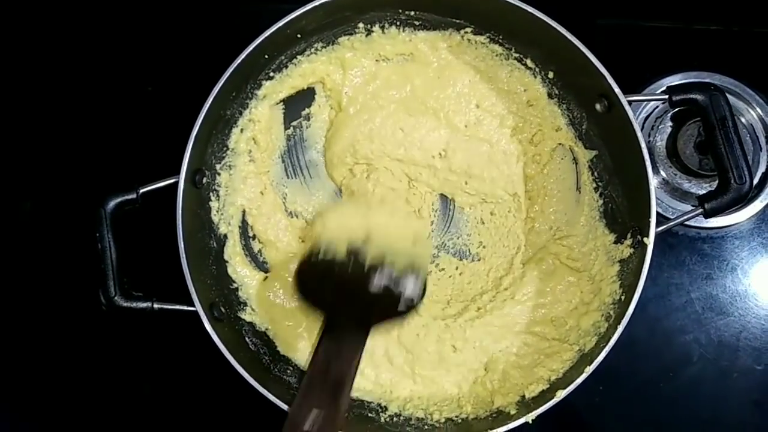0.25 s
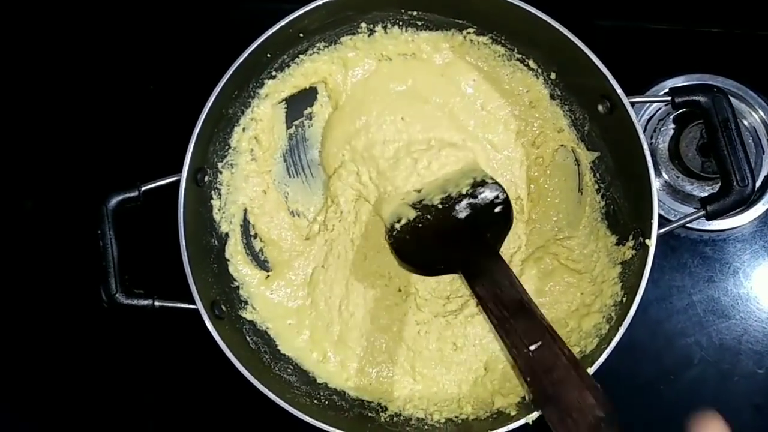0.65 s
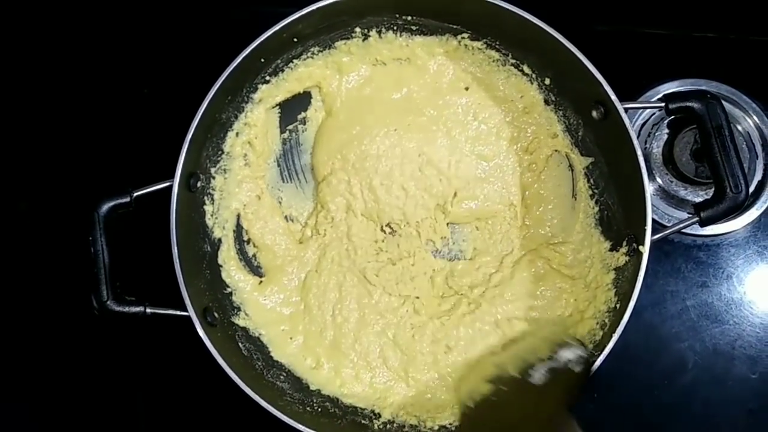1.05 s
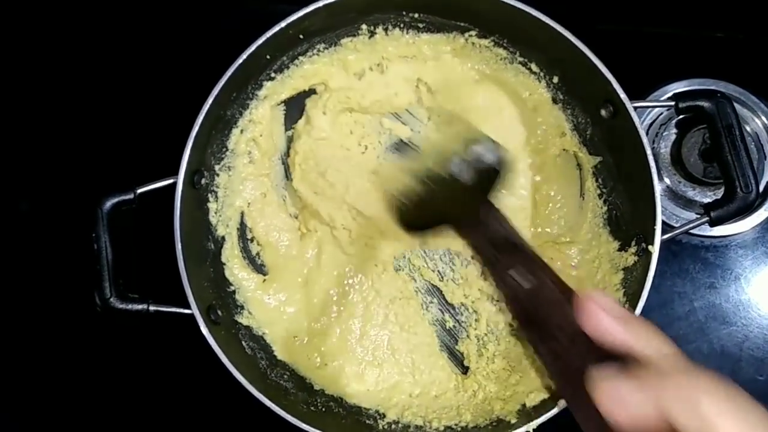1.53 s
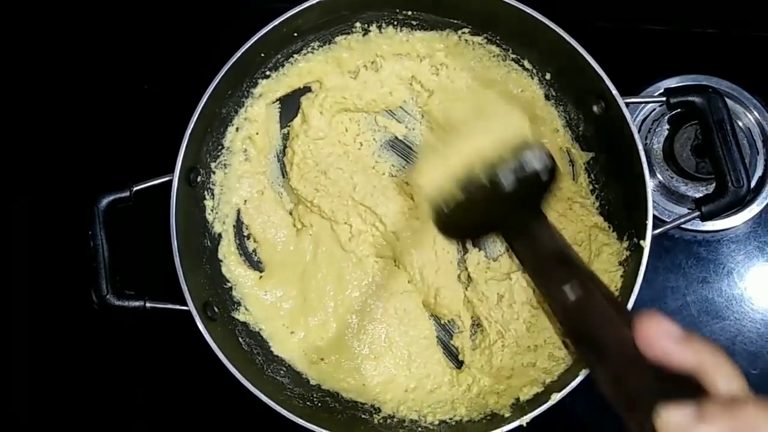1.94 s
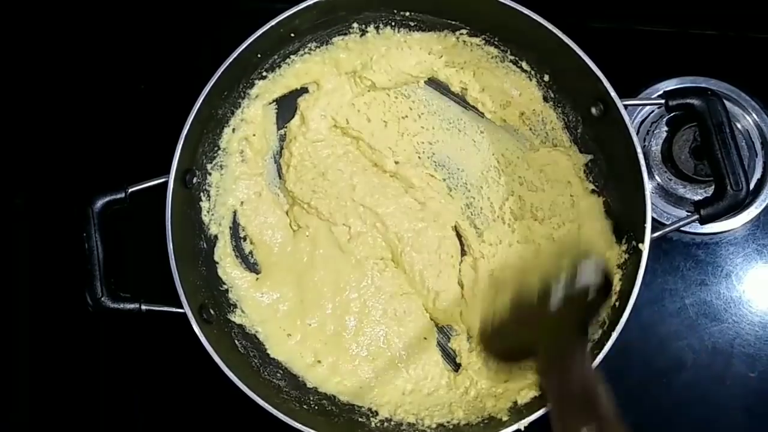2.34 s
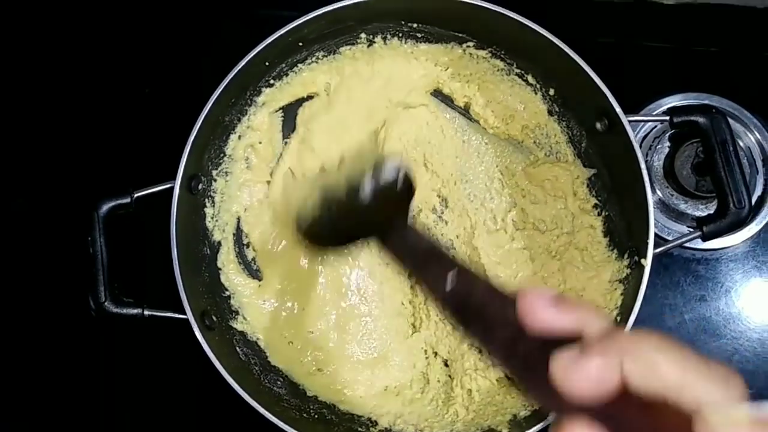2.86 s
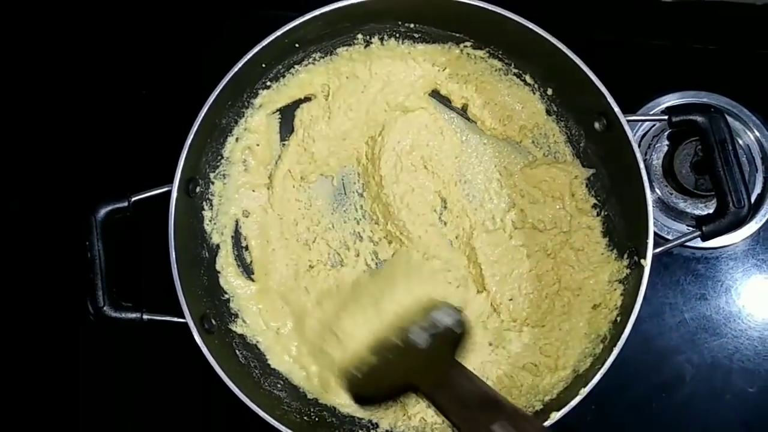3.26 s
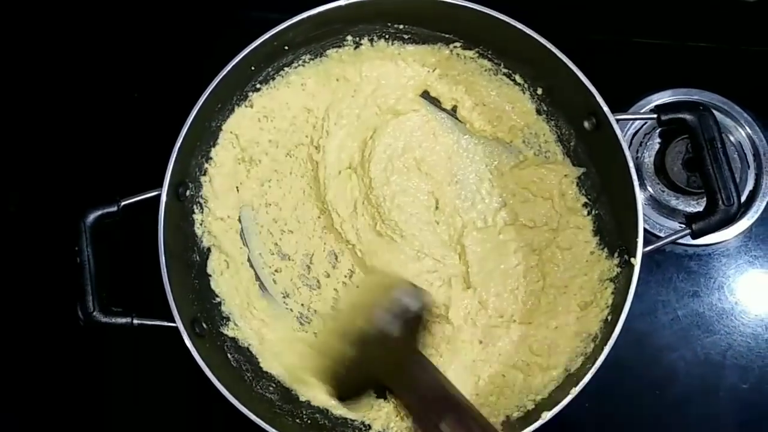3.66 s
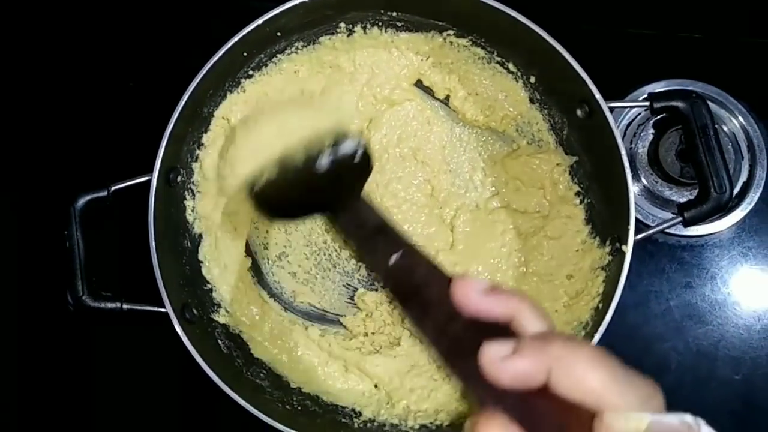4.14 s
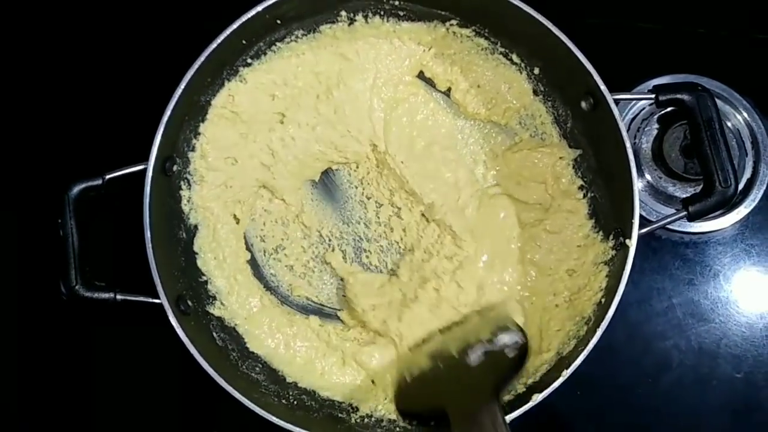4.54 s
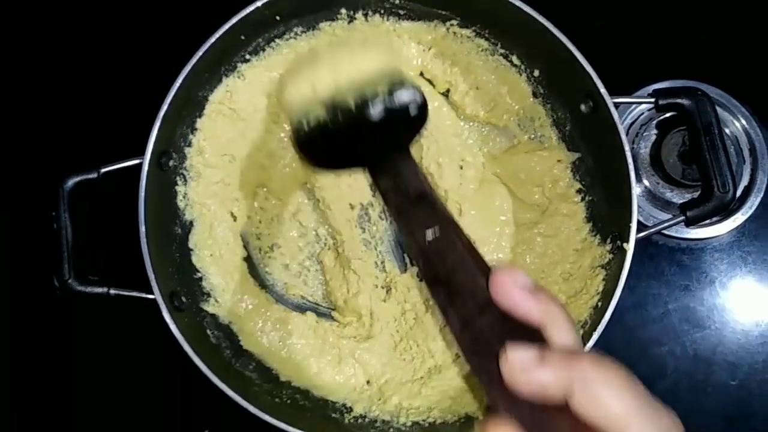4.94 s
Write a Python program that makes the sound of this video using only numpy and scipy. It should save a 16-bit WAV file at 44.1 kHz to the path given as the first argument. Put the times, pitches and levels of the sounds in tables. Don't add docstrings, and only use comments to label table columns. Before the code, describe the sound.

A close, dry kitchen sound with little echo and slightly different grit in each ear. It begins quietly with sparse grit and clicks; at about 0.2 to 0.4 s a hissing scrape chatters with a nasal pan ring, then nearly rests, with faint hum flutters. A softer drag follows at 0.76 s. A hard, ringing knock at 1.08 s begins regular spatula strokes, roughly three per second, with strong landings at 1.45, 1.83 and 2.13 s. Each is a low paste-damped thud followed by a bright, grainy hiss that swells and fades. Wet paste snaps crackle throughout, sharpest near 1.25 and 1.55 s. Strokes continue through 2.5, 2.8, 3.2, 3.46 and 3.8 s, then soften after 4 s. Two dull microphone-mount bumps come at 4.7 s, sound drops away briefly, a scrape returns at 4.85 s, and bright bare steel clangs and rattles at 5.1 s.

```python
import sys
import numpy as np
from scipy import signal
from scipy.fft import rfft, irfft, next_fast_len
from scipy.io import wavfile
from scipy.ndimage import uniform_filter1d

SR = 44100
rng = np.random.default_rng(int(sys.argv[2]) if len(sys.argv) > 2 else 0)


def voltage_ratio(level):
    return 10 ** (np.asarray(level, float) / 20)


def master_out(mix):
    frames = np.transpose(np.atleast_2d(mix))
    ceiling = np.clip(frames, -1, 1)
    pcm = np.round(ceiling * 32767).astype(np.int16)
    wavfile.write(sys.argv[1], SR, pcm)


N = 228894


def evened(x):
    return x / np.sqrt(np.mean(x ** 2) + 1e-20)


def read(points, hz):
    f, value = np.transpose(points)
    return np.interp(np.log(hz + 1), np.log(f + 1), value)


def over_time(points):
    return np.interp(np.arange(N) / SR, *np.transpose(points))


def add(mix, s, sound):
    part = mix[..., round(s * SR):][..., :sound.shape[-1]]
    part += sound[..., :part.shape[-1]]


def resonate(x, hz, width):
    r = np.exp(-np.pi * width / SR)
    if np.isscalar(hz):
        return 2 * signal.lfilter([1 - r], [1, -r * np.exp(2j * np.pi * hz / SR)], x).real
    turn = np.exp(2j * np.pi * np.cumsum(hz) / SR)
    return 2 * (turn * signal.lfilter([1 - r], [1, -r], x / turn)).real


def colour(x, points):
    size = next_fast_len(x.shape[-1], True)
    hz = np.fft.rfftfreq(size, 1 / SR)
    inside = (hz >= points[0][0]) * (hz <= points[-1][0])
    return irfft(rfft(x, size) * voltage_ratio(read(points, hz)) * inside, size)[..., :x.shape[-1]]


def lumps(seconds):
    size = max(round(seconds * SR), 1)
    return evened(uniform_filter1d(uniform_filter1d(rng.standard_normal(N), size), size))


def grit(per_s, spread_db, lump_db, lump_s):
    happens = rng.random((2, N)) < per_s / SR
    size = voltage_ratio(spread_db * np.minimum(rng.exponential(1, (2, N)), 4)) * happens
    return size * rng.standard_normal((2, N)) * voltage_ratio(lump_db * lumps(lump_s))


def ringing(modes, t, since=0):
    phase = 2 * np.pi * rng.random((len(modes), 2, 1)) * np.array([[0], [1]])
    out = 0
    for (hz, db, t60), p in zip(modes, phase):
        out = out + voltage_ratio(db - 60 * t / t60) * np.sin(2 * np.pi * hz * (t + since) + p)
    return out


def dying(rows, db_per_s):
    out, fall = np.zeros(N), voltage_ratio(-db_per_s * np.arange(SR // 2) / SR)
    for s, db, *_ in rows:
        add(out, s, voltage_ratio(db) * fall)
    return out


def patchy(x, depth_db):
    z = signal.stft(x, nperseg=256, noverlap=192)[2]
    field, gaps = rng.standard_normal((2, *z.shape[1:]))
    for _ in range(2):
        field = uniform_filter1d(uniform_filter1d(field, size=3, axis=0), size=16, axis=1)
        gaps = uniform_filter1d(uniform_filter1d(gaps, size=2, axis=0), size=22, axis=1)
    hole_db = 15.0 * np.maximum(evened(gaps) - 1.5, 0)
    return signal.istft(z * voltage_ratio(depth_db * evened(field) - hole_db), nperseg=256, noverlap=192)[1][:, :N]


# frequency in Hz, likeness from 0 to 1.
PORT_LIKENESS = [(25, 0.52), (100, 0.76), (300, 0.96), (600, 0.89), (1100, 0.17), (2500, 0.069),
                 (5000, 0.1), (12000, 0.28)]
# frequency in Hz, left over right in dB.
PORT_BALANCE = [(60, -5), (110, -3), (200, 0.5), (380, 1), (700, -0.5), (1290, 0), (2380, -1), (4400, 0.5),
                (8120, -6.5), (15000, -5.5)]


def ports(pair):
    size = next_fast_len(N, True)
    hz = np.fft.rfftfreq(size, 1 / SR)
    shared, stray = rfft(pair, size)
    same, lean = np.clip(read(PORT_LIKENESS, hz), 0, 1), voltage_ratio(read(PORT_BALANCE, hz) / 2)
    left = (same * shared + np.sqrt(1 - same ** 2) * stray) * lean
    return irfft(np.array([left, shared / lean]), size)[:, :N]


# start in seconds, brightest grit in Hz, its lift in dB,
# left-right balance in dB, lag of the left port in samples.
STROKE_PLACES = [(0, 5500, 7, 0.5, 8), (.18, 8100, 4, -2.5, 8), (.755, 6460, 6.5, 2, 10),
                 (1.081, 6440, -0.5, -1, 5), (1.452, 8800, 2, 0, 3), (1.829, 7440, 1, 0.5, 2),
                 (2.134, 8100, 2, -0.5, 3), (2.477, 7000, 2.5, -0.5, 10), (2.805, 8700, -1, 1, 11),
                 (3.163, 5700, 3.5, -0.5, 8), (3.411, 5630, 3, 0.5, 7), (3.786, 7500, 0, -1, 6),
                 (4.191, 5340, 2, -1, 8), (4.505, 8950, 5, -1.5, 3), (4.851, 7700, 0.5, 1.5, 6),
                 (5.099, 8700, -17, 6.5, 19)]


def place(column):
    rows = np.array(STROKE_PLACES)
    return rows[np.searchsorted(rows[:, 0], np.arange(N) / SR, "right") - 1, column]


def placed(pair):
    later = np.clip(np.arange(N) - np.round(place(4)).astype(int), 0, N - 1)
    side = voltage_ratio(np.array([[.5], [-.5]]) * uniform_filter1d(place(3), 100))
    return np.array([pair[0, later], pair[1]]) * side


# frequency in Hz, time to fall 60 dB in seconds.
KITCHEN_T60 = [(200, 0.37), (1000, 0.11), (4000, 0.091), (12000, 0.13)]


def kitchen(x):
    hz, t, z = signal.stft(rng.standard_normal((2, SR // 2)), SR, nperseg=256)
    tail = signal.istft(z * voltage_ratio(-60 * t / read(KITCHEN_T60, hz)[:, None]), SR, nperseg=256)[1]
    return signal.fftconvolve(x, tail / np.linalg.norm(tail[0]), axes=1)[:, :N]


# time in seconds, drone level in dB.
GATE_LEVEL = [(0, -75), (.2, -71.5), (.43, -61.5), (.58, -74.5), (.75, -68.5), (1.02, -67), (1.3, -66.5),
              (1.65, -70), (2.0, -69.5), (3.1, -73), (3.8, -73.5), (4.479, -84), (4.55, -75.5), (4.68, -81),
              (4.76, -68), (4.8, -97.5), (4.86, -65.5), (5.19, -51.5)]
# frequency in Hz, level in dB.
SIZZLE_SPECTRUM = [(200, -11), (600, -8.5), (2000, -17.5), (4500, -21), (6000, -20), (9000, -22),
                   (11000, -21.5), (16300, -33.5)]


def sizzle():
    bubbles = patchy(evened(colour(grit(12000, 2., 2.5, .03), SIZZLE_SPECTRUM)), 3.5)
    return voltage_ratio(-79.0 + np.minimum(over_time(GATE_LEVEL) + 75, 0)) * bubbles


# frequency in Hz, level in dB.
RUMBLE_SPECTRUM = [(12, -48), (20, -31), (38, -19.5), (70, 1.5), (87, -12), (102, -1.5), (193, -2.5),
                   (225, -29), (240, -31), (310, -56.5), (530, -120)]
# start in seconds, level in dB.
STOVE_JOLTS = [
    (1.48, -56.5),
    (1.83, -49.5),
    (3.17, -61),
    (3.47, -68),
]
# start in seconds, length in seconds, level in dB.
GATED_HUM = [(0.45, 0.031, -54), (0.643, 0.031, -55.5), (0.707, 0.034, -57), (0.744, 0.024, -54),
             (0.78, 0.047, -54.5), (0.87, 0.02, -58.5), (0.945, .05, -68.5), (1.054, .05, -64.5),
             (1.11, 0.046, -67.5), (1.215, 0.031, -62), (1.294, 0.042, -57.5), (1.477, 0.036, -70),
             (1.558, 0.035, -75.5), (1.688, 0.081, -63), (1.915, 0.028, -61.5)]
# start in seconds, end in seconds, pitch in Hz, level in dB.
GATED_RING = (4.425, 4.495, 1068, -79)


def drone():
    hum = 1.1 * np.sin(2 * np.pi * 100 * np.arange(N) / SR) * np.array([[1], [.3]])
    low = evened(colour(rng.standard_normal((2, N)), RUMBLE_SPECTRUM)) + hum
    flutter = voltage_ratio(5.7 * np.tanh(2.2 * lumps(0.009)))
    shake = uniform_filter1d(dying(STOVE_JOLTS, 120.5), size=600)
    low = evened(low * flutter) * (voltage_ratio(over_time(GATE_LEVEL)) + shake)
    for s, length, db in GATED_HUM:
        part = hum[:, round(s * SR):][:, :round(length * SR)]
        add(low, s, voltage_ratio(db) * part * signal.windows.tukey(round(length * SR), .6))
    start, end, hz, db = GATED_RING
    t = np.arange(round((end - start) * SR)) / SR
    add(low, start, voltage_ratio(db) * np.sin(2 * np.pi * hz * t) * signal.windows.tukey(len(t), .5))
    return low


# time in seconds, spike in dB, spike width in seconds,
# swing in dB, swing pitch in Hz, swing time to fall 60 dB in seconds.
MOUNT_BUMPS = [
    (4.6893, -40, 0.00043, -44, 87, 0.094),
    (4.7213, -33, 0.00032, -38.5, 113, 0.028),
]


def bumps():
    out, t = np.zeros(N), np.arange(SR // 8) / SR
    for s, db, width, swing_db, hz, t60 in MOUNT_BUMPS:
        spike = voltage_ratio(db) * np.exp(-(abs(t - .001) / width) ** 1.7)
        swing = voltage_ratio(swing_db - 60 * t / t60) * np.sin(2 * np.pi * hz * t)
        add(out, s - .001, spike - swing)
    return out


# pitch in Hz, level in dB, time to fall 60 dB in seconds.
STEEL_PARTIALS = [(1196, -7, .3), (1572, 1, .5), (1691, -7, .4), (1896, -9, .3), (2476, -6, .28),
                  (2751, -7, .3), (2947, -7, .3), (3122, -10, .3), (3490, -1, .25), (3941, -10, .06),
                  (5103, -18, .14), (6002, -7, .2), (7375, -18, .15), (8150, -17, .12), (9039, -10, .14),
                  (10770, -22, .1)]
# frequency in Hz, level in dB.
CLATTER_SPECTRUM = [(250, -14.5), (900, -10), (1250, 1), (2500, -4), (3650, -6), (3900, -23), (4400, -26.5),
                    (4700, -21), (6000, -12), (7000, -33), (9000, -29), (10000, -31), (16000, -29)]
# start in seconds, level in dB, clatter level in dB.
STEEL_CLANGS = [
    (5.1029, -29, -29.5),
    (5.109, -51, -34.5),
    (5.118, -28.5, -32.5),
    (5.123, -73, -30.5),
    (5.153, -42, -35),
]


def clang():
    out, t = np.zeros((2, N)), np.arange(SR // 8) / SR
    for s, db, clatter_db in STEEL_CLANGS:
        clatter = evened(colour(rng.standard_normal((2, len(t))), CLATTER_SPECTRUM))
        clatter = voltage_ratio(clatter_db - 1.5 - 60 * t / .25) * clatter
        add(out, s, voltage_ratio(db - 3) * ringing(STEEL_PARTIALS, t, s) + clatter)
    return out


# start in seconds, peak in dB, shared over stray part in dB, less 18.5 dB.
PASTE_SNAPS = [(0.0468, -40, -3.5), (0.1818, -40.5, -5.5), (0.1935, -43, -7), (.2668, -38.5, -6),
               (0.8225, -46.5, -3.5), (.8619, -39, -1.5), (.897, -36, -2), (1.4431, -43, -9),
               (1.4523, -35, 8.5), (1.491, -40.5, -3.5), (1.8306, -28, -4.5), (2.6554, -40.5, -1.5),
               (2.7831, -52, -4.5), (2.8823, -34.5, -1.5), (2.915, -36, -3.5), (3.511, -34, -3),
               (3.6407, -37, 4), (3.7978, -33.5, -1.5), (4.1068, -39, -0.5), (4.2, -44.5, -1),
               (4.2526, -35.5, -5), (4.8948, -39, -1.5), (1.244, -23.5, -12), (1.279, -31.5, -6),
               (1.3595, -38.5, -8), (1.3639, -35, -10.5), (1.371, -39.5, -4), (1.418, -44, -9.5),
               (2.993, -33.5, -5), (2.728, -49.5, -5), (2.734, -41, -0.5), (1.5475, -26.5, -5.5),
               (1.549, -22, -1.5), (1.55, -20, -3), (1.5515, -26.5, -3), (.148, -52, -2),
               (0.629, -56.5, -3), (3.475, -34.5, -2), (1.61, -33.5, -4), (1.725, -41, -5),
               (1.79, -48.5, -5.5), (1.817, -39.5, -4.5), (2.3204, -33, -5.5), (2.441, -44.5, -6),
               (2.4794, -29, -0.5), (2.7307, -35.5, 0.5), (2.8047, -35.5, 2), (3.171, -35, -7.5),
               (3.2163, -27, -2), (3.2175, -27.5, -3.5), (3.4378, -59, -14), (3.4623, -28.5, -0.5),
               (4.0282, -33, -9), (4.307, -42, -4.5), (4.371, -49, -2.5), (4.475, -61.5, -9),
               (4.5062, -50, 5), (5.031, -36, -8)]


def snaps():
    out, t = np.zeros((2, N)), np.arange(2500) / SR
    for s, db, pan_db in PASTE_SNAPS:
        fall = voltage_ratio(-7.0 - 60 * t / 0.004) + voltage_ratio(-14.5 - 60 * t / 0.035)
        burst = rng.standard_normal((2, len(t))) * fall + 0.67 * (t == 0)
        add(out, s, voltage_ratio(db - 4.0) * burst * voltage_ratio(np.array([[.5], [-.5]]) * (pan_db + 18.5)))
    return colour(ports(out), [(300, -5), (1500, -8.5), (4000, 0.0), (9000, 5.5), (16200, -17.0)])


# start in seconds, length in
# seconds, level in dB, pitch in Hz, width in Hz.
GRIT_SQUEAKS = [(0.244, 0.15, -53, 1600, 140), (0.266, 0.15, -53, 2110, 310), (0.291, 0.16, -64, 2430, 166),
                (.26, 0.077, -67, 3300, 570), (.26, 0.11, -58, 900, 77), (1.09, .11, -44.5, 944.6, 12),
                (4.2, 0.056, -51, 5500, 900), (4.24, .04, -59, 890, 50), (.18, 0.07, -62, 407, 160),
                (.27, 0.072, -43.5, 1130, 90), (1.076, 0.13, -48, 1996, 92), (1.09, 0.13, -46, 607, 60),
                (1.08, 0.084, -53, 1460, 31), (1.08, 0.11, -47, 2466, 110), (1.16, 0.066, -48.5, 3880, 150),
                (1.35, 0.053, -62, 9650, 3000), (1.399, .05, -64, 11300, 5000), (2.327, .1, -56.5, 742, 68),
                (2.328, 0.056, -51.5, 603, 75), (3.24, .05, -45, 3470, 210), (3.283, 0.064, -60, 7600, 330),
                (5.098, 0.021, -49, 4200, 500)]


def squeaks():
    out = np.zeros((2, N))
    for s, length, db, hz, width in GRIT_SQUEAKS:
        u = np.linspace(0, 1, round(length * SR))
        band = resonate(resonate(rng.standard_normal((2, len(u))), hz, width), hz, width)
        add(out, s, voltage_ratio(db) * evened(band) * np.sin(np.pi * u ** 0.79))
    return out


# start in
# seconds, peak in dB, pitch in Hz.
BLADE_SKIPS = [(.021, -49, 545), (.246, -37.5, 1190), (0.2785, -27, 1150), (0.354, -28, 1140),
               (.37, -35, 1200), (0.271, -63, 380), (0.296, -42.5, 490), (0.331, -39.5, 552),
               (1.105, -37, 607), (1.155, -37, 586), (3.232, -34, 780), (4.2535, -37, 910),
               (0.289, -30, 1230), (0.303, -25.5, 1100), (0.309, -30, 1213), (0.324, -38, 1100),
               (0.338, -38, 1210), (0.312, -26.5, 1200), (.351, -35, 1185), (0.789, -56, 410),
               (0.807, -52.5, 520), (1.475, -43.5, 169.3), (1.833, -39.5, 163), (2.14, -46, 169),
               (2.208, -42.5, 305), (2.237, -47.5, 296), (2.32, -40, 1240), (2.342, -35.5, 586),
               (2.368, -48, 754), (3.42, -60.5, 182), (3.499, -47.5, 180), (1.501, -33, 369),
               (1.547, -36.5, 430), (2.177, -30, 410), (2.198, -35, 420), (2.48, -44.5, 625),
               (2.828, -34.5, 387), (2.893, -38, 415), (2.927, -45.5, 429), (3.19, -40, 400),
               (3.253, -41.5, 440), (3.428, -37, 329), (3.448, -30, 433), (3.491, -29.5, 505),
               (4.08, -56, 880), (4.191, -50, 857), (4.889, -48.5, 436), (5.03, -46, 860)]
# start in seconds, level in dB, fade in dB per second.
EDGE_HISS = (.1815, -49.5, 68)
# frequency in Hz, level in dB.
EDGE_SPECTRUM = [(7500, -25), (7750, -9), (8300, -11), (8950, 1), (9400, -14), (9600, -30)]


def chatter():
    out, t = np.zeros((2, N)), np.arange(SR // 8) / SR
    for s, db, hz in BLADE_SKIPS:
        ring = ringing([(hz, 0, 29 / hz), (hz * 1.3, -10, 12 / hz)], t)
        add(out, s, voltage_ratio(db) * ring * np.minimum(t / 0.001, 1))
    s, db, db_per_s = EDGE_HISS
    t = np.arange(SR // 3) / SR
    hiss = evened(colour(rng.standard_normal((2, len(t))), EDGE_SPECTRUM))
    add(out, s, voltage_ratio(db - db_per_s * t - 30 * (t / 0.37) ** 4) * hiss)
    return out


# pitch in Hz, level in dB, time to fall 60 dB in seconds.
PAN_PARTIALS = [(301, -4, .5), (441, -5, .2), (603, -7, .3), (745, -12, .2), (943, -3, .25),
                (1068, -18, .3), (1464, -14, .11), (1540, -16, .1), (1997, -15, .12), (2455, -12, .15),
                (2719, -13, .12), (3203, -10, .2), (3553, -8, .12), (4953, -4, .1)]
# start in seconds, peak in dB, thud pitch in Hz, clear ring in dB,
# ring region in Hz.
PAN_KNOCKS = [(1.0791, -17, 387, -5.5, 1100), (1.123, -29, 602, 1, 1400), (1.454, -27, 352, -10.5, 301),
              (1.831, -19.5, 337.5, -26.5, 301), (2.133, -19.5, 330, -30, 301), (2.158, -21, 412, -40, 301),
              (2.3197, -26.5, 720, -18, 715), (2.804, -27, 302, -34, 301), (3.161, -35, 357, -29, 400),
              (3.217, -27.5, 308, -31, 301), (3.414, -41, 454, -20.5, 399), (3.463, -22, 440, -21.5, 503),
              (3.788, -28, 406, -33.5, 400), (3.822, -32, 420, -12, 408), (4.253, -45.5, 876, -14, 943),
              (4.507, -50.5, 400, -11, 1070), (4.851, -36, 462, -14.5, 600)]


def knocks():
    out, t = np.zeros((2, N)), np.arange(SR // 3) / SR
    for s, db, hz, ring_db, near_hz in PAN_KNOCKS:
        thud_t60 = 0.054 * (400 / hz) ** 0.42
        thud = ringing([(hz, -2.5, thud_t60), (hz * 1.6, -3, .018), (hz * 2.1, -7, .014)], t)
        octaves_away = np.abs(np.log2(np.array(PAN_PARTIALS)[:, 0] / near_hz))
        modes = [(f, d + ring_db - 12 * a, t60) for (f, d, t60), a in zip(PAN_PARTIALS, octaves_away)]
        damping = evened(uniform_filter1d(rng.standard_normal(len(t)), size=300))
        ring = ringing(modes, t) * voltage_ratio(4.6 * damping)
        tick = voltage_ratio(-17.5 - 60 * t / 0.0046) * rng.standard_normal((2, len(t)))
        add(out, s, voltage_ratio(db) * (thud + ring + tick) * np.minimum(t / 0.0017, 1))
    return signal.sosfilt(signal.butter(2, 190, "high", fs=SR, output="sos"), out)


# landing in seconds, speeding up in seconds, time to fade 30 dB in seconds,
# grit at full speed in dB, pressure in dB.
BLADE_STROKES = [(0.0, 0.047, 0.11, -52, -3.5), (0.183, 0.16, 0.12, -46.5, -3.5),
                 (0.459, 0.04, 0.5, -74, -0.5), (0.758, 0.12, 0.24, -56.5, -11),
                 (1.059, 0.012, 1, -64.5, -11), (1.083, 0.11, 0.2047, -42, -5),
                 (1.449, 0.13, 0.2235, -39.5, -5.5), (1.076, 0.0051, -0.0325, -51, 11.5),
                 (1.828, 0.035, 0.2575, -38, -4), (2.131, 0.07, 0.2747, -42.5, -4.5),
                 (2.313, 0.0028, 0.09, -50.5, -8), (2.475, 0.086, 0.2158, -43, -5),
                 (2.726, 0.0019, 0.8, -66.5, -9.5), (2.802, 0.12, 0.1963, -45, -6.5),
                 (3.121, 0.12, -0.42, -71, 2.5), (3.162, 0.09, 0.13, -44.5, -2),
                 (3.212, 0.026, 0.0746, -48, -1.5), (.1, 0.064, 0.03, -71, -5.5),
                 (3.413, 0.11, -0.32, -65.5, 3), (3.461, 0.091, 0.15, -41.5, -1.5),
                 (3.784, 0.09, 0.3, -47.5, -3.5), (4.07, 0.05, 0.32, -58, -13),
                 (4.192, 0.04, 0.18, -51, -9.5), (4.504, 0.065, 0.3, -60, -3),
                 (4.848, 0.055, 0.5, -49.5, -2.5)]


def strokes(swing, per_pressure):
    climb_db_per_s, fade_curve = 74.5, 1.16
    touch_s = 0.0012
    out = np.zeros(N)
    for start, rise, fade, db, pressure_db in BLADE_STROKES:
        rise, fade = max(rise, touch_s), max(fade, .015)
        late = np.arange(round((rise + 2 * fade) * SR)) / SR - rise
        speed_db = np.where(late < 0, climb_db_per_s * late, -30 * (np.abs(late) / fade) ** fade_curve)
        level = voltage_ratio(db + per_pressure * pressure_db + swing * speed_db)
        add(out, start, level * np.minimum((late + rise) / touch_s, 1))
    return out


# start in seconds, shudder in dB,
# loudest region at first in Hz, and where it ends in Hz.
PAN_CONTACTS = [(0, -68, 704, 800), (0.178, -62, 1150, 1240), (0.234, -52.5, 1166, 1200),
                (0.256, -44.5, 1192, 1200), (0.286, -43.5, 1180, 1250), (0.316, -57, 1186, 1250),
                (0.343, -67, 1230, 1200), (0.499, -75, 401, 500), (0.758, -60.5, 380, 450),
                (1.079, -35, 511, 746), (1.453, -35, 352, 590), (1.832, -37, 439, 650),
                (2.138, -28.5, 334, 608), (2.317, -56, 642, 700), (2.476, -45.5, 505, 735),
                (2.727, -74, 853, 810), (2.806, -33, 393, 450), (3.163, -50.5, 392, 430),
                (3.413, -46.5, 402, 450), (3.433, -43, 403, 450), (3.454, -34, 455, 530),
                (3.789, -41.5, 395, 900), (4.079, -60, 944, 397), (4.191, -67, 442, 800),
                (4.505, -59, 418, 600), (4.853, -51.5, 494, 620)]


def pan_region():
    t, rows = np.arange(N) / SR, np.array(PAN_CONTACTS)
    start, _, from_hz, to_hz = rows[np.searchsorted(rows[:, 0], t, "right").clip(1) - 1].T
    return from_hz + (to_hz - from_hz) * np.clip((t - start) / 0.17, 0, 1)


# frequency in Hz, level in dB.
FINE_SPECTRUM = [(2060, -11.5), (3500, -14), (3980, -12.5), (4500, -8), (6220, 0.5), (7350, -3.5),
                 (8860, -0.5), (15100, -17), (16000, -25.5), (16400, -29)]


def fine_grit():
    crackle = 0.18 * evened(grit(600, 3.5, 2.1, 0.009))
    fine = evened(colour(evened(grit(14000, 0.58, 1.1, 0.0032)) + crackle, FINE_SPECTRUM))
    bright_hz, lift_db = place(1), place(2)
    fine = fine + (voltage_ratio(lift_db) - 1) * resonate(resonate(fine, bright_hz, 2300), bright_hz, 2300)
    return fine * strokes(1.0, 0) * voltage_ratio(-0.49 * lift_db)


# frequency in Hz, level in dB.
COARSE_SPECTRUM = [(650, -20.5), (1100, -2), (1250, 0.5), (1390, -4.5), (2310, -4), (2610, -5), (5200, -6),
                   (6760, -17.5), (11400, -120)]


def coarse_grit():
    crackle = 0.18 * evened(grit(600, 3.5, 2.1, 0.009))
    coarse = evened(colour(evened(grit(9000, 1.6, 0.58, 0.0051)) + crackle, COARSE_SPECTRUM))
    return coarse * voltage_ratio(2.0) * strokes(1.42, 0.98)


# pitch in Hz, width in Hz, level in dB.
PAN_RESONANCES = [(260, 24, -2), (301, 26, 1), (380, 50, -0.5), (433, 41.6, 0.5), (455, 43, -0.5),
                  (524, 38, -4.5), (603, 22, 0.5), (613, 18, -2), (654, 23, -2), (747, 19, 3),
                  (779, 76, -1), (881, 21, 4), (935, 39, 5.5), (990, 73, -2), (1123, 10, -13.5),
                  (1100, 92, 2), (1200, 23, 6), (1340, 200, -4.5), (1690, 62, 6)]


def pan_rumble():
    region = uniform_filter1d(pan_region(), 200)
    slips = grit(1500, 3.15, 0.42, 0.0079)
    slips = resonate(resonate(slips, region, 400), region, 400) + .25 * (region / 800) ** 2 * slips
    power = uniform_filter1d(colour(slips, [(230, 0.0084), (1400, 0.0028)])[0] ** 2, size=1800)
    slips = slips / np.sqrt(power + 1e-9)
    shudder = dying(PAN_CONTACTS, 172.5)
    slips = slips * voltage_ratio(4.5) * np.hypot(shudder, voltage_ratio(5.5) * strokes(2.16, 1.64))
    pan = np.zeros((2, N))
    for k, (hz, width, db) in enumerate(PAN_RESONANCES):
        pan += (-1) ** k * voltage_ratio(db) * resonate(slips, hz, width)
    return colour(pan, [(130, -19.0), (260, -0.5), (1400, -3.0), (2000, -6.0)])


def scrape():
    return patchy(fine_grit() + coarse_grit(), 2.6) + pan_rumble()


# time in seconds, level in dB.
SCENE_FADE = [(0, 0), (4.68, 0), (4.74, -12), (4.812, -22), (4.82, -90), (4.848, -90), (4.851, 0), (5.2, 0)]


def scene():
    near = placed(ports(scrape() + knocks() + chatter() + clang() + squeaks()) + snaps())
    heard = near + voltage_ratio(-23.5) * kitchen(near) + sizzle() + ports(drone())
    return heard * voltage_ratio(over_time(SCENE_FADE)) + bumps()


def roll_off(x):
    return signal.sosfilt(signal.butter(12, 16250, fs=SR, output="sos"), x)


def record(dry):
    mix = signal.oaconvolve(dry, signal.firwin(255, 16300, fs=SR)[None], "same")
    return roll_off(mix)


dry = scene()
out = record(dry)
master_out(out)
```